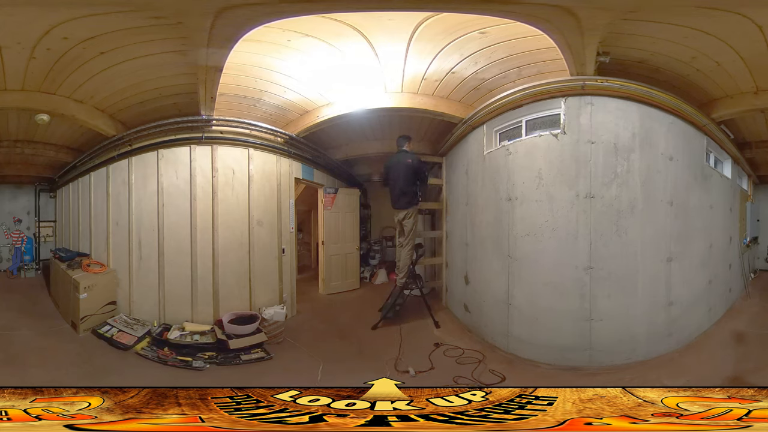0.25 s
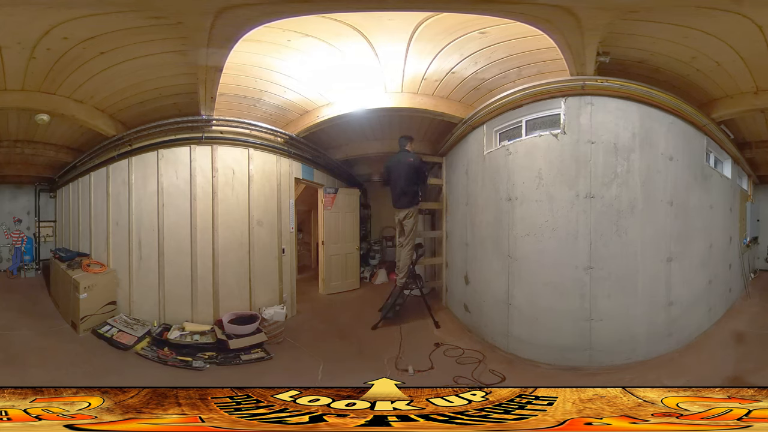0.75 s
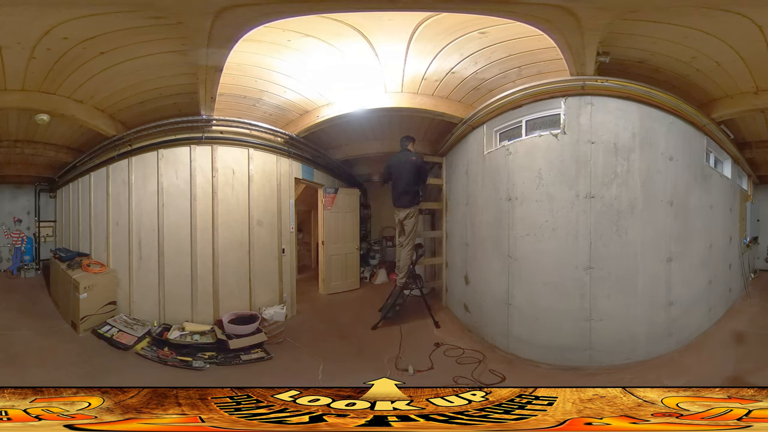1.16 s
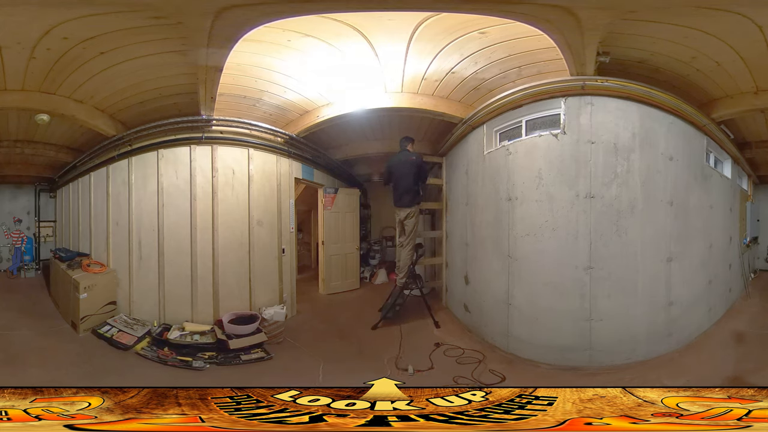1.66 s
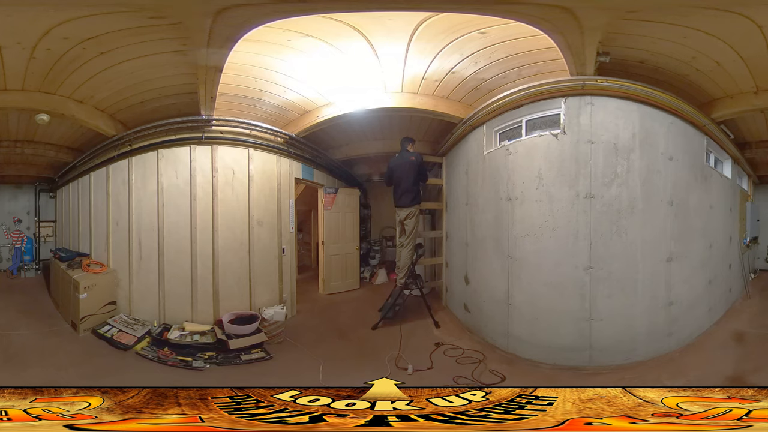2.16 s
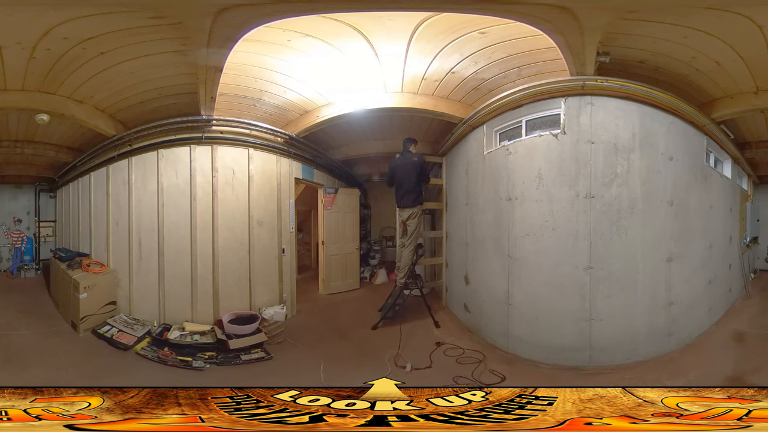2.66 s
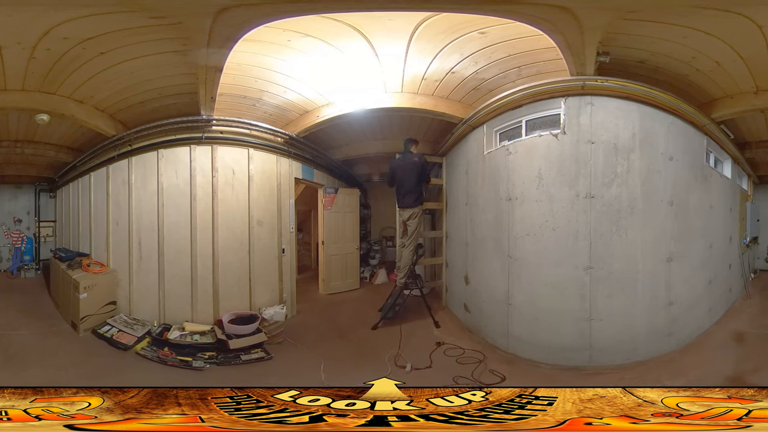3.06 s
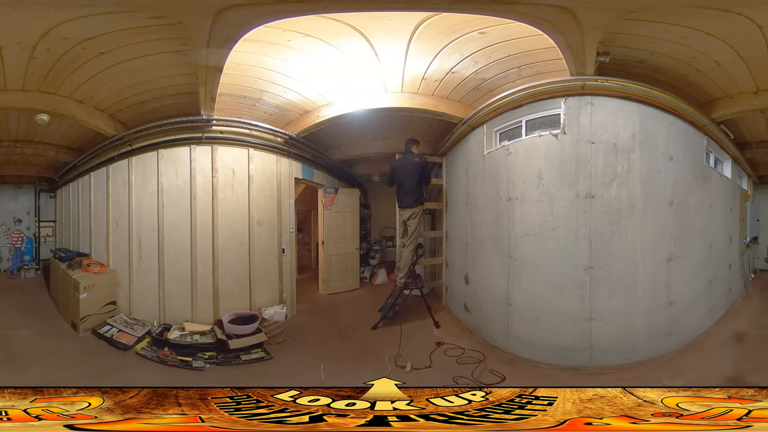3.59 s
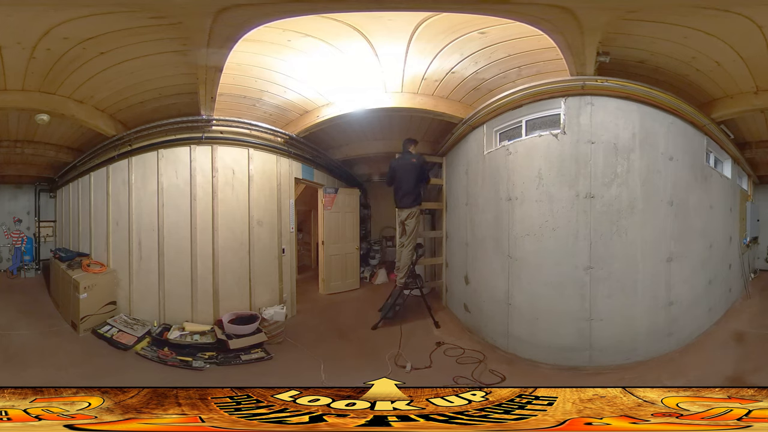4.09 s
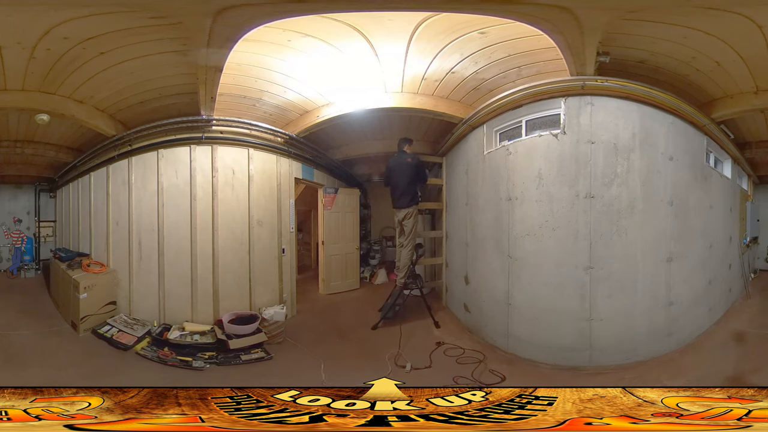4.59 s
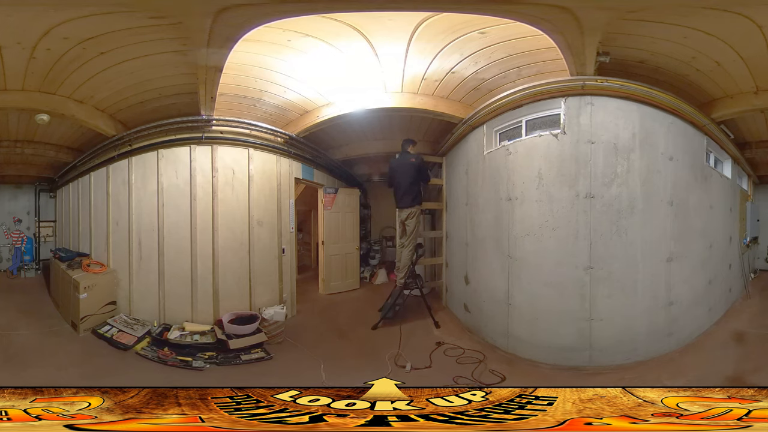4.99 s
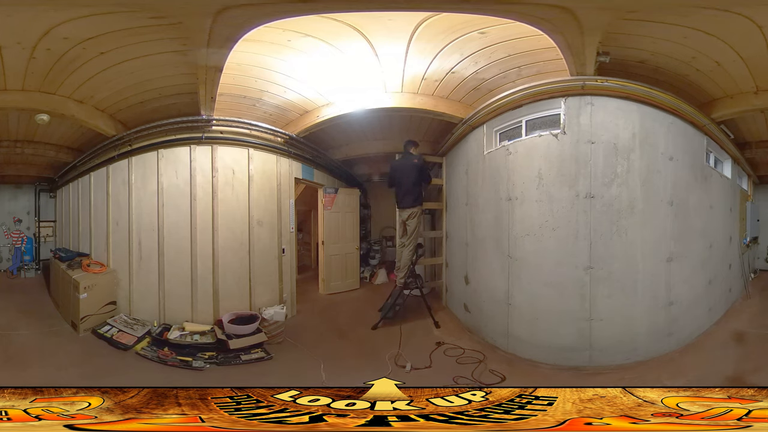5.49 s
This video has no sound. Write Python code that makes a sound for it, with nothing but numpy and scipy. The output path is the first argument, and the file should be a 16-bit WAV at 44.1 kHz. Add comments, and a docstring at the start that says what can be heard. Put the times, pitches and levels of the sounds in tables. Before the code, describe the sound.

A hammer drill coasts to a stop in a bare basement, pauses, then spins up and rattles and grinds into concrete in uneven bouts.

```python
"""A corded hammer drill at a concrete basement wall: it coasts down with a few last knocks of the bit,
then rests in the soft rush of the room, which swells once. Knocks, the trigger, a rough howl of the
gears as the motor spins up, then it bores on. In bouts the ratchet engages: impacts rattle and ring
the wall. In between it chatters, the bit binds, the motor slows, and two carbide lips scrape and ring
once a turn each. One spindle phase times hammer, bit and motor; noise bursts ring resonant filters."""
import sys
import numpy as np
from scipy import signal
from scipy.fft import rfft, irfft, next_fast_len
from scipy.io import wavfile
from scipy.ndimage import map_coordinates

SR = 44100
rng = np.random.default_rng(int(sys.argv[2]) if len(sys.argv) > 2 else 0)


def store_wav(level_fs):
    """Save 16-bit WAV to argv[1]."""
    pcm = np.round(np.clip(np.atleast_2d(level_fs), -1, 1) * 32767)
    wavfile.write(sys.argv[1], SR, pcm.T.astype(np.int16))


N = 253134


def amp(db):
    """Decibels to gain."""
    return 10 ** (np.asarray(db) / 20)


def unit(x):
    """Scale to rms 1."""
    return x / np.sqrt(np.mean(x ** 2) + 1e-20)


def along(points, hz):
    """(Hz, value) points read on a log frequency axis."""
    f, v = np.transpose(points)
    return np.interp(np.log(hz + 1), np.log(f + 1), v)


def curve(rows):
    """(s, value) rows as one value per sample."""
    return np.interp(np.arange(N) / SR, *np.transpose(rows))


def wobble(knots_per_s):
    """A smooth random curve through normal knots."""
    knots = rng.standard_normal(int(N * knots_per_s / SR) + 4)
    return map_coordinates(knots, [np.arange(N) * knots_per_s / SR])


def gate(start_s, end_s, attack_s, release_s):
    """An envelope that rises from start, holds at 1 and falls from end."""
    t = np.arange(N) / SR
    rise = np.clip((t - start_s) / attack_s, 0, 1)
    return rise * np.clip(1 - (t - end_s) / release_s, 0, 1)


def coloured(x, gain):
    """x through the causal minimum-phase filter whose magnitude is gain(Hz)."""
    m = 2 * next_fast_len(N // 2 + SR // 4)
    magnitude = np.maximum(gain(np.fft.rfftfreq(m, 1 / SR)), 1e-6)
    # folding the cepstrum gives minimum phase
    cepstrum = irfft(np.log(magnitude), m)
    cepstrum[1:m // 2] *= 2
    cepstrum[m // 2 + 1:] = 0
    return irfft(rfft(x, m) * np.exp(rfft(cepstrum)), m)[:N]


def resonances(modes, hz):
    """Magnitude of a set of (Hz, width Hz, dB) resonances, summed in power."""
    return np.sqrt(sum((amp(db) * hz * w) ** 2 / ((c * c - hz * hz) ** 2 + (hz * w) ** 2) for c, w, db in modes))


def below(hz, edge_hz):
    """Magnitude of a low-pass."""
    return 1 / np.sqrt(1 + (hz / edge_hz) ** 8)


def above(hz, edge_hz):
    """Magnitude of the high-pass complementary in power."""
    return np.sqrt(1 - below(hz, edge_hz) ** 2)


def treble(x, order, edge_hz):
    """Zero-phase high-pass of x."""
    return signal.sosfiltfilt(signal.butter(order, edge_hz, 'high', fs=SR, output='sos'), x)


def strikes(cycles, scatter, spread_db):
    """One impulse per cycle, uneven in time (scatter in cycles) and size."""
    beats = np.arange(1, int(cycles[-1]))
    late, size = rng.standard_normal((len(beats), 2)).T
    at = np.interp(beats + scatter * late, cycles, np.arange(N)).astype(int)
    # tanh bounds the sizes
    return np.bincount(at, amp(spread_db * 2 * np.tanh(size / 2)), N)


def crunch(blows, life_s):
    """Each blow crumbles into a short, decaying noise burst of grit."""
    t = np.arange(SR // 20) / SR
    return signal.fftconvolve(blows, np.exp(-t / life_s))[:N] * rng.standard_normal(N)


# Spectrum of a blow. Each row: frequency in Hz, relative level in dB.
BLOW_SPECTRUM = [(29, -79), (50, -38), (77, -16), (138, -32), (208, -24.5), (353, -10), (398, -12),
                 (507, -6), (559, -8), (694, 1), (1270, 0), (2160, -4), (3180, -7.5), (5400, -7.5),
                 (16000, -24)]
# Resonances of wall and drill housing. Each row: centre in Hz, width in Hz, relative level in dB.
WALL_MODES = [(466, 32, -7), (516, 38, -0.5), (676, 3.7, -8), (725, 12, -3), (845, 6.9, -1.5),
              (905, 96, -2.5), (1168, 21, -1), (1680, 11, -20), (1873, 58, -0.5), (2203, 17, 2.5),
              (2580, 21, -4), (2485, 16, -4), (3670, 69, -10.5)]
# Low resonances of the basement. Each row: centre in Hz, width in Hz, relative level in dB.
THUD_MODES = [(85, 9.9, -1), (128, 15, -5), (171, 15, -10), (226.6, 31, 10), (349, 23, 11.5)]


def hammer(speed_hz, turns):
    """Ratchet teeth throw the bit at the wall: a dense, uneven rattle that rings room, wall and housing."""
    thud_gain, boom_gain, rattle_gain, brightness = hammering()
    teeth = 18
    taps = strikes(teeth * turns, scatter=.45, spread_db=3.0) * rng.choice([-1, 1], N)
    crumbs = crunch(strikes(3 * turns, scatter=.3, spread_db=5.5), life_s=0.0019)
    # slow turning gives fewer but heavier blows
    blows = (unit(taps) + amp(-4.5) * unit(crumbs)) / np.sqrt(np.maximum(speed_hz, 20))
    # the contact chatters, and presses harder once a turn
    blows = blows * amp(1.3 * wobble(55) + 1.3 * np.cos(2 * np.pi * turns))

    def body(hz):
        return amp(along(BLOW_SPECTRUM, hz)) * np.hypot(1, amp(3.5) * resonances(WALL_MODES, hz))

    thud = unit(coloured(blows, lambda hz: resonances(THUD_MODES, hz) * below(hz, 277) * above(hz, 78)))
    boom = unit(coloured(blows, lambda hz: body(hz) * below(hz, 1807) * above(hz, 297)))
    rattle = unit(coloured(blows, lambda hz: body(hz) * above(hz, 1203)))
    # harder contact sharpens the rattle
    rattle = rattle + (brightness - 1) * treble(rattle, 2, 3300)
    # slow blows are softer and lack the top treble
    rattle = rattle - np.clip(1 - speed_hz / 80, 0, 1) * treble(rattle, 4, 5500)
    return amp(-3.5) * thud_gain * thud + amp(-1.0) * boom_gain * boom + amp(-2.0) * rattle_gain * rattle


# Bouts of full hammering. Each row: start in seconds, end in seconds, then relative levels in dB of
# the thud, the boom of the wall, the ratchet rattle, the rattle's brightness and the pounding.
BOUTS = [(-.03, 0.43, -38.5, -14, -16.5, -0.5, -52), (1.476, 1.732, -41.5, -21, -18.5, 1.5, -54),
         (2.23, 2.75, -40, -19.5, -16, 0, -20), (4.29, 5.13, -52, -25.5, -19, 3.5, -31)]
ENGAGE_S, DISENGAGE_S = .025, .02
COAST_FADE_DB_PER_S = 31
# Light chatter of the ratchet between bouts. Each row: time in seconds, relative level in dB.
CHATTER = [(1.85, -19.5), (2.13, -20.5), (2.87, -25), (3.2, -26.5), (3.6, -27.3), (3.95, -25), (4.22, -24),
           (5.3, -24.9), (5.55, -21), (5.69, -22.5)]
# relative levels when CHATTER reads USUAL_DB, and dB gained per dB of chatter
USUAL_DB, CHATTER_THUD_DB, CHATTER_BOOM_DB, CHATTER_RATTLE_DB = -23, -52.5, -27.5, -21
THUD_GROWS, BOOM_GROWS, RATTLE_GROWS = 0.87, 1.57, 0.87


def hammering():
    """Gains of thud, boom, rattle and brightness: full bouts over the light chatter of the running drill."""
    t = np.arange(N) / SR
    # the hand presses a little unevenly
    push_db = curve(CHATTER) - USUAL_DB + .7 * wobble(11)
    running = np.clip((t - BOUTS[1][0]) / ENGAGE_S, 0, 1)
    chatter_db = [CHATTER_THUD_DB + THUD_GROWS * push_db,
                  CHATTER_BOOM_DB + BOOM_GROWS * push_db,
                  CHATTER_RATTLE_DB + RATTLE_GROWS * push_db]
    power = (running * amp(chatter_db)) ** 2
    bright_db = 0
    for start_s, end_s, thud_db, boom_db, rattle_db, sharp_db, _ in BOUTS:
        engaged = gate(start_s, end_s, ENGAGE_S, DISENGAGE_S)
        power = power + np.outer(amp([thud_db, boom_db, rattle_db]), engaged) ** 2
        bright_db = bright_db + sharp_db * engaged
    # the blows weaken as the spindle coasts
    coasting = amp(-COAST_FADE_DB_PER_S * t * (t < TRIGGER_S))
    thud_gain, boom_gain, rattle_gain = coasting * np.sqrt(power)
    return thud_gain, boom_gain, rattle_gain, amp(bright_db)


# The steel bit as each lip excites it. Each row: centre in Hz, width in Hz, relative level in dB.
LEADING_MODES = [(5080, 240, -14), (6283, 160, -1), (6420, 200, -7), (8260, 270, -13.5),
                 (14500, 670, -10.5)]
TRAILING_MODES = [(14600, 400, 0), (15250, 900, -3)]
# Spectrum of chipping concrete. Each row: frequency in Hz, relative level in dB.
CHIP_SPECTRUM = [(1000, -28.5), (3000, -10.5), (6000, -7), (8200, 1), (9500, -4.5), (12000, -5),
                 (16000, -6.5)]


def bit(turns, lead_gain, trail_gain):
    """The two lips catch half a turn apart, chip the concrete and ring the steel."""
    lead_catches = strikes(turns, scatter=0.013, spread_db=6.5)
    trail_catches = strikes(turns + .5, scatter=0.0024, spread_db=0.0)
    # scrape plus snap
    lead = unit(crunch(lead_catches, life_s=0.0015)) + unit(lead_catches)
    trail = unit(crunch(trail_catches, life_s=0.0011)) + unit(trail_catches)
    ring = lead_gain * unit(coloured(lead, lambda hz: resonances(LEADING_MODES, hz)))
    # squared: the high ring of the shank has steep flanks
    shank = coloured(trail + amp(-8.5) * lead, lambda hz: resonances(TRAILING_MODES, hz) ** 2)
    squeak = trail_gain * unit(shank)
    # the leading lip breaks off most of the grit
    breaks = strikes(turns, scatter=0.0067, spread_db=1.8) + amp(-10) * trail_catches
    grit = crunch(breaks, life_s=0.0023)
    chips = trail_gain * unit(coloured(grit, lambda hz: amp(along(CHIP_SPECTRUM, hz))))
    return amp(0.5) * ring + amp(-2.5) * squeak + amp(-1.5) * chips


# Spells in which the bit binds. Each row: start in seconds, end in seconds, speed lost in turns per
# second, then relative levels in dB of the leading lip, the trailing lip and the hum.
BINDS = [(1.66, 2.21, 0, -23, -33.5, -70), (2.725, 4.31, 11.5, -26, -22, -53.5),
         (4.92, 4.94, 0, -44, -31, -73), (5.151, 5.74, 10, -29.5, -22.5, -58.5)]
BITE_S, FREE_S = .06, .1
LEAD_DB_PER_HZ = 0.07  # the leading lip catches harder at speed
DULL_DB_PER_S = 0.33  # the trailing lip grows quieter through a spell


def binding(speed_hz):
    """Gains of the leading lip, the trailing lip and the hum while the bit binds."""
    t = np.arange(N) / SR
    lead = trail = drone = 0
    for start_s, end_s, _, lead_db, trail_db, hum_db in BINDS:
        bound = gate(start_s, end_s, BITE_S, FREE_S)
        lead = lead + bound * amp(lead_db + LEAD_DB_PER_HZ * (speed_hz - 83))
        trail = trail + bound * amp(trail_db - DULL_DB_PER_S * (t - start_s))
        drone = drone + bound * amp(hum_db)
    return lead, trail, drone


def hum(turns, hum_gain):
    """Each catch of a lip also pushes on the wall: a wavering hum, twice a turn."""
    return amp(wobble(5.5)) * hum_gain * np.sin(4 * np.pi * turns)


# Push on the wall that repeats every turn. Each row: cycles per spindle turn, relative level in dB.
POUND_LINES = [(1, -33), (2, -24), (3, -31), (4, -30), (6, -10), (8, -8)]


def pound(turns):
    """In each bout the hammer presses hardest once a turn: low, wavering harmonics of the spindle."""
    gain = sum(amp(pound_db) * gate(start_s, end_s, attack_s=0.14, release_s=.06)
               for start_s, end_s, *_, pound_db in BOUTS)
    lines = sum(amp(db + 2.5 * wobble(7)) * np.sin(2 * np.pi * order * turns + .6 * wobble(14))
                for order, db in POUND_LINES)
    return gain * lines


# Single knocks of bit and trigger. Each row: time in seconds, relative dB of tick, relative dB of body.
KNOCKS = [(0.0308, -36, -16.5), (0.0556, -17, -11.5), (.108, -21, -8.5), (0.2866, -8, -19),
          (0.402, -15.5, -18.5), (1.4664, -32, -19.5), (1.484, -26, -12)]
# The loose bit knocking in its chuck. Each row: centre in Hz, width in Hz, relative level in dB.
CHUCK_MODES = [(2100, 200, 4), (4000, 600, -16), (5200, 480, -2.5), (6940, 800, -8.5), (14500, 830, -5)]
# Spectrum of the housing's knock. Each row: frequency in Hz, relative level in dB.
KNOCK_BODY = [(59, -73.5), (100, -20.5), (495, -12.5), (695, -4), (1180, -5), (1290, -6.5), (2190, -10),
              (4570, -14.5), (5120, -22.5), (9000, -28), (11700, -92), (19800, -120)]


def knocks():
    """Single contacts: a bright tick of steel and a duller knock of the housing."""
    ticks, thuds = np.zeros(N), np.zeros(N)
    for time_s, tick_db, body_db in KNOCKS:
        ticks[round(time_s * SR)] = amp(tick_db)
        thuds[round(time_s * SR)] = amp(body_db)

    def steel_gain(hz):
        return resonances(CHUCK_MODES, hz) + amp(-25.0) * amp(along(CHIP_SPECTRUM, hz))

    steel = coloured(crunch(ticks, life_s=0.0018), steel_gain)
    housing = coloured(crunch(thuds, life_s=0.0063), lambda hz: amp(along(KNOCK_BODY, hz)))
    return amp(14.5) * steel + amp(16.5) * housing


FREE_HZ, INERTIA_S, TRIGGER_S = 86.3, .162, 1.455  # no-load turns per second, lag, trigger pull
COAST_HZ, REST_S = 70, .46  # power off at first: initial turns per second, time of rest


def spindle():
    """Turns per second: it coasts to rest, then chases its free speed less the drag of the binding bit."""
    t = np.arange(N) / SR
    drag_hz = sum(lost * ((t >= start_s) & (t < end_s)) for start_s, end_s, lost, *_ in BINDS)
    step = 1 / (INERTIA_S * SR)
    driven = signal.lfilter([step], [1, step - 1], (FREE_HZ - drag_hz) * (t >= TRIGGER_S))
    return np.maximum(driven + COAST_HZ * np.clip(1 - t / REST_S, 0, 1), 1)


# Motor tones; low orders are wobble of the chuck, 26 is the gear mesh.
# Each row: cycles per spindle turn, relative level in dB.
WHINE_LINES = [(3, -63), (4, -55.5), (5, -63), (26, -34), (52, -51)]
# Spectrum of the cooling air. Each row: frequency in Hz, relative level in dB.
AIR_SPECTRUM = [(60, -28), (400, -20.5), (750, 5), (2000, 5.5), (3200, -7), (6000, -0.5), (10000, -16.5),
                (16000, -1)]


def motor(speed_hz, turns):
    """Gear and fan tones waver over the rush of cooling air; all grow with speed."""
    tones = sum(amp(db + 2.2 * wobble(11)) * np.sin(2 * np.pi * order * turns + .33 * wobble(50))
                for order, db in WHINE_LINES)
    # the fan whistles near top speed, where its blade tone meets a resonance of the vents
    blade_order = 91
    vents = resonances([(7860, 200, 0)], blade_order * speed_hz)
    fan = vents * np.sin(2 * np.pi * blade_order * turns + .3 * wobble(40))
    whistle = amp(-34.5 + 2 * wobble(14)) * fan
    air = unit(coloured(rng.standard_normal(N), lambda hz: amp(along(AIR_SPECTRUM, hz))))
    return (speed_hz / 80) ** 2 * (tones + whistle + amp(-26.5) * air)


def spin_up(turns):
    """The gear mesh howls roughly while the motor's starting torque loads it."""
    torque = gate(1.52, 1.74, attack_s=.07, release_s=.11)
    mesh = 26 * turns
    # fast phase wobble roughens three harmonics
    howl = sum(amp(db) * np.sin(2 * np.pi * k * mesh + .75 * wobble(400))
               for k, db in enumerate([-31, -22, -24], 1))
    return torque * howl


# Decay of the basement. Each row: frequency in Hz, time to fall 60 dB in seconds.
DECAY = [(100, .5), (700, .6), (2000, .56), (4000, .44), (7000, .37), (15000, .3)]


def echo_tail():
    """A dense noise echo of energy 1 in which the treble dies first."""
    hz, t, z = signal.stft(rng.standard_normal(int(.7 * SR)), SR, nperseg=256)
    fade = amp(-60 * t / along(DECAY, hz)[:, None])
    fade /= np.sqrt(np.mean(fade ** 2, axis=1, keepdims=True))
    tail = signal.istft(z * fade, SR, nperseg=256)[1]
    # 3 ms of pre-delay
    return np.pad(tail / np.linalg.norm(tail), (round(.003 * SR), 0))


# Echo against direct sound. Each row: frequency in Hz, echo over direct in dB.
ECHO_RATIO = [(200, 3), (2000, 1.5), (6000, 3), (15000, -1)]


def basement(x):
    """Direct sound plus the echo of bare concrete, which shifts as drill and worker move."""
    step = SR // 12
    echo, n = np.zeros(N + 2 * SR), np.arange(N)
    # overlapping slices, each with a fresh tail
    for centre in range(0, N + step, step):
        near = n[np.abs(n - centre) < step]
        window = np.cos(np.pi / 2 * (near - centre) / step)
        part = signal.fftconvolve(x[near] * window, echo_tail())
        echo[near[0]:near[0] + len(part)] += part

    def wet(hz):
        return amp(along(ECHO_RATIO, hz))

    # direct sound and echo share the power
    return coloured(x + coloured(echo[:N], wet), lambda hz: 1 / np.hypot(1, wet(hz)))


# Spectrum of the quiet room. Each row: frequency in Hz, relative level in dB.
QUIET_SPECTRUM = [(24, -62), (40, -27), (81, -10), (96, -30), (115, 0), (159, -12), (209, -4.5), (570, -6),
                  (1180, -5.5), (12800, -19.5), (16000, -28)]
FLOOR_DB = -58.5
# One soft swell of the room: start in seconds, end in seconds, rise in dB.
SWELL = (0.87, 1.19, 2)


def background():
    """The soft rush of the room, heard while the drill rests: shaped noise that swells once."""
    start_s, end_s, swell_db = SWELL
    level_db = FLOOR_DB + swell_db * gate(start_s, end_s, attack_s=.025, release_s=.025)
    return amp(level_db) * unit(coloured(rng.standard_normal(N), lambda hz: amp(along(QUIET_SPECTRUM, hz))))


def scene():
    """One spindle drives hammer, bit and motor; both channels carry the same sound."""
    speed_hz = spindle() * (1 + .001 * wobble(15))
    turns = np.cumsum(speed_hz) / SR
    lead_gain, trail_gain, hum_gain = binding(speed_hz)
    contacts = hammer(speed_hz, turns) + bit(turns, lead_gain, trail_gain) + spin_up(turns) + knocks()
    # the contacts echo off the walls; the steady sounds fill the room evenly
    steady = motor(speed_hz, turns) + hum(turns, hum_gain) + pound(turns) + background()
    mono = basement(contacts) + steady
    return np.array([mono, mono])


TOP_HZ = 15850


def record(dry):
    """A sharp band limit: nothing passes at or above TOP_HZ."""
    m = next_fast_len(N + SR // 2)
    return irfft(rfft(dry, m) * (np.fft.rfftfreq(m, 1 / SR) < TOP_HZ), m)[:, :N]


dry = scene()
out = record(dry)
store_wav(out)
```